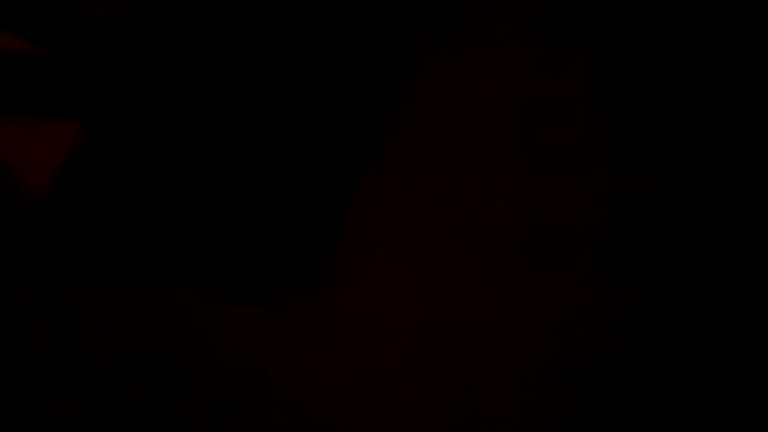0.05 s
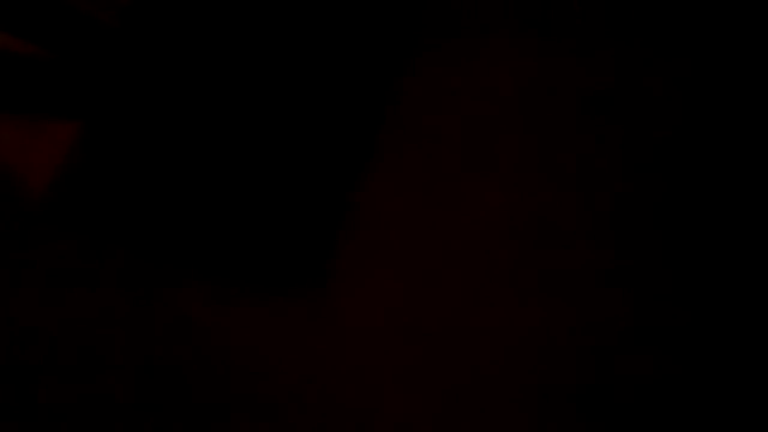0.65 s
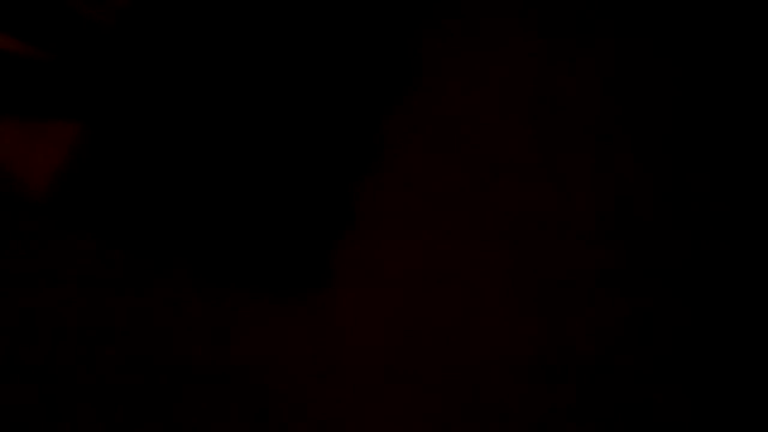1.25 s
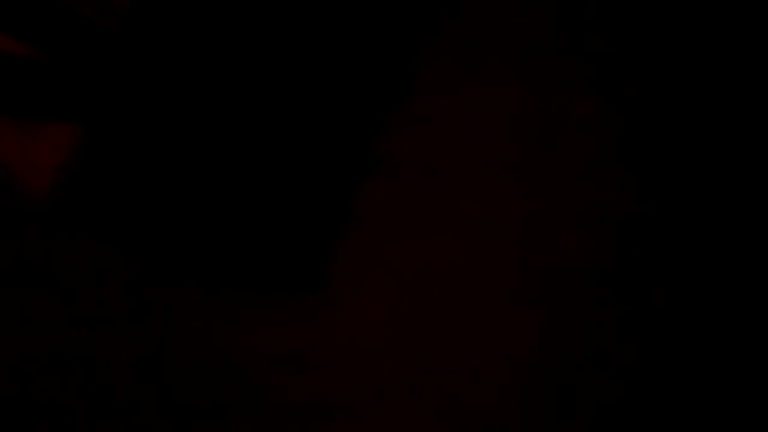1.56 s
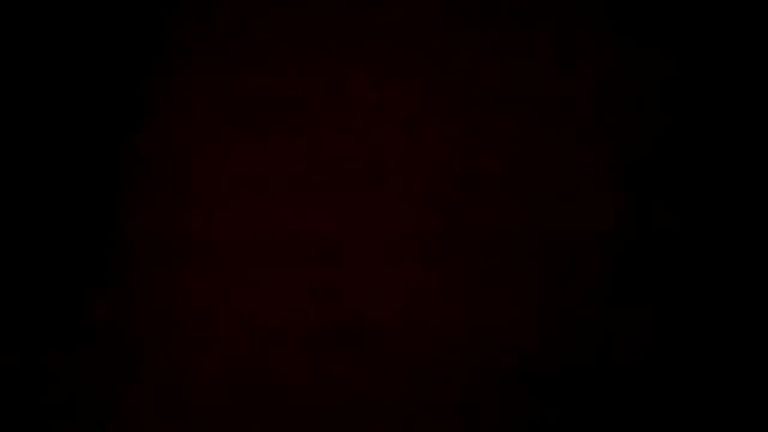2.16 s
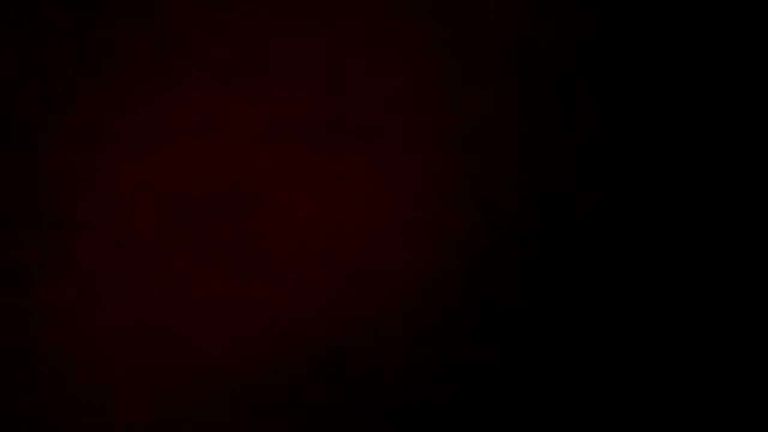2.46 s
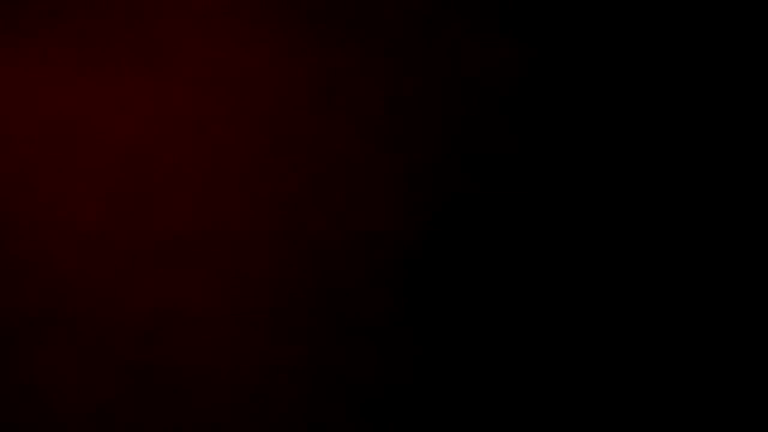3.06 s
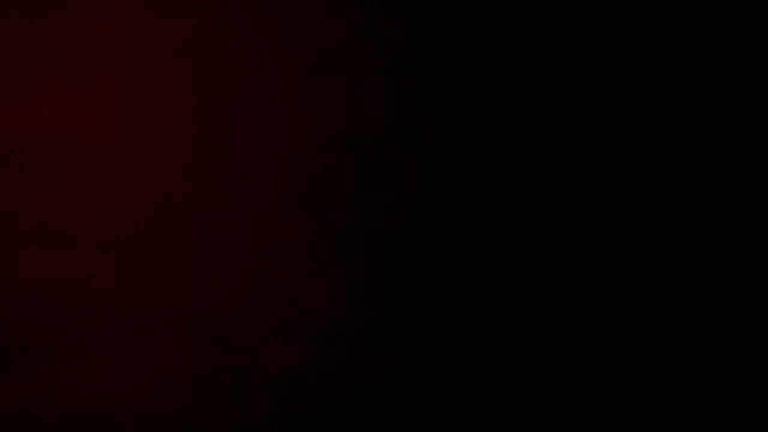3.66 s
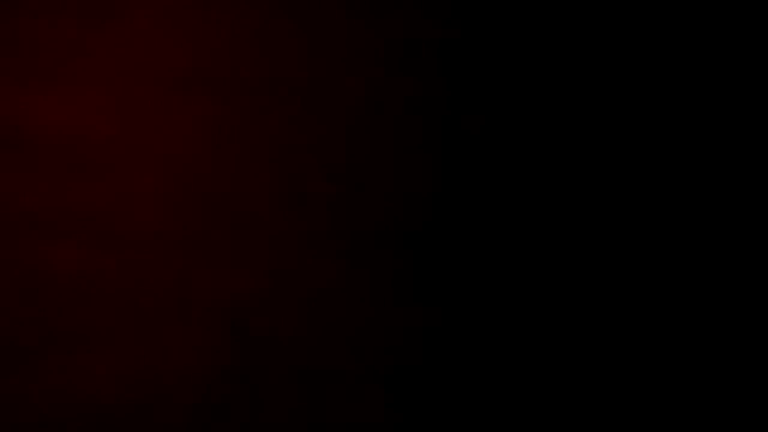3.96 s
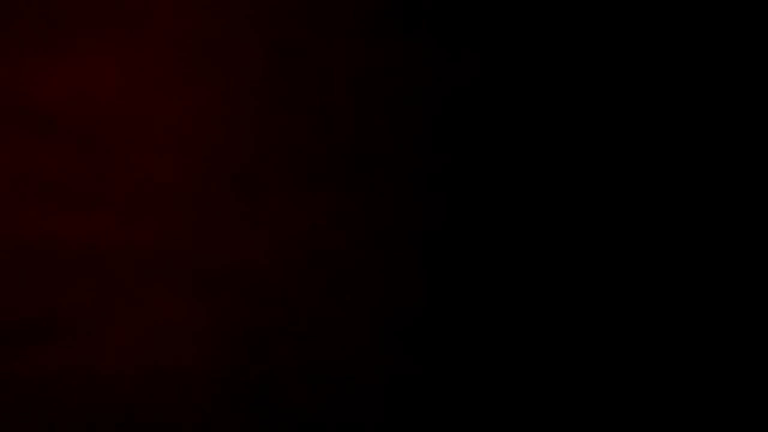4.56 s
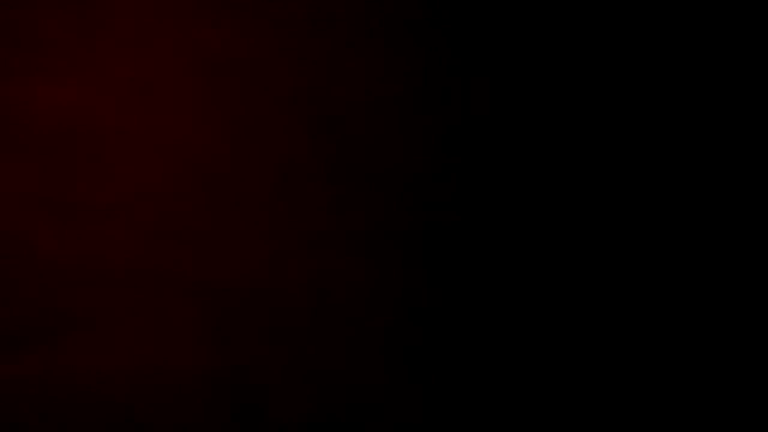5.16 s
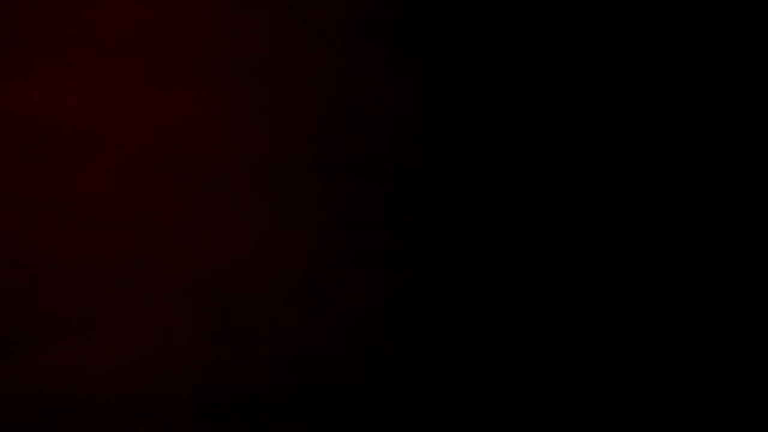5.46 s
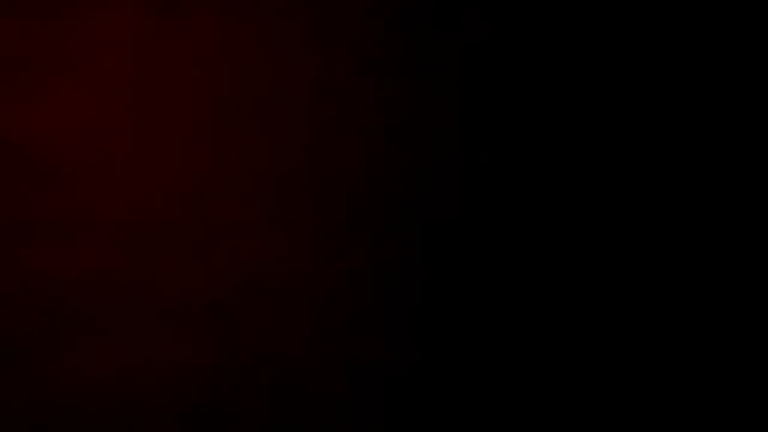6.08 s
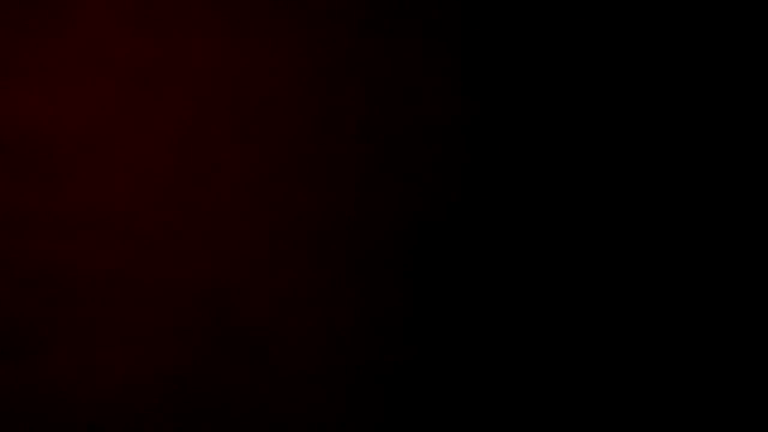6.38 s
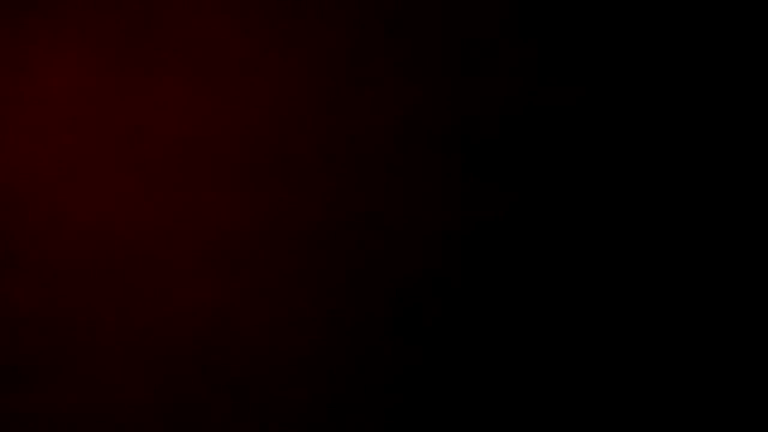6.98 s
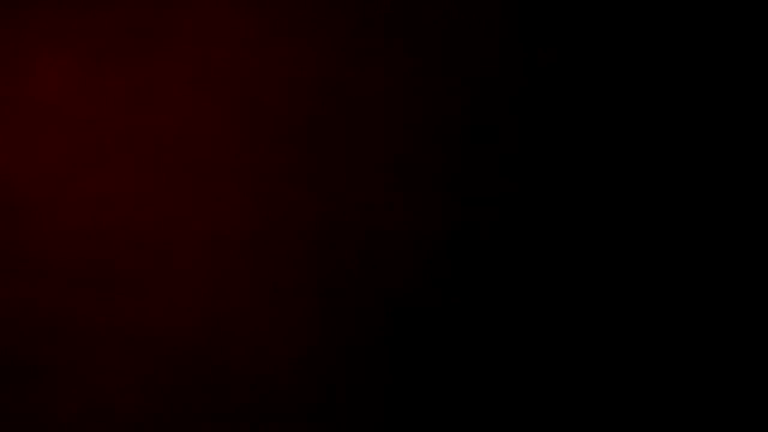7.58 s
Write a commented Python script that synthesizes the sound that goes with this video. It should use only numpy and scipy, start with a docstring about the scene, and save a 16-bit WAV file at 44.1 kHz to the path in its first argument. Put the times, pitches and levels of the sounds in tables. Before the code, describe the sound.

Close, steady cat purring rises and falls with each breath, joined early by small clicks and fur brushing the microphone.

```python
"""In a quiet room with a faint fan hum, a cat purrs right beside a camera.
Its larynx chops the breath about 24 times a second, and the pulses excite a chest resonance:
round thumps as air flows in, lighter double beats with a turbulent rasp as it flows out.
A few small clicks, a soft dull knock and one faint stray purr beat come early; then fur rubs over
the camera, hissing by friction and ticking as tufts snap free. The purr settles toward the right."""
import sys
import numpy as np
from scipy import signal
from scipy.fft import rfft, irfft, next_fast_len
from scipy.io import wavfile
from scipy.ndimage import uniform_filter1d

SR = 44100
rng = np.random.default_rng(int(sys.argv[2]) if len(sys.argv) > 2 else 0)


def transcribe(signal):
    """Save signal, clipped to [-1, 1], as a 16-bit WAV file at the path in sys.argv[1]."""
    frames = np.atleast_2d(signal).T
    limited = np.clip(frames, -1, 1)
    pcm = np.round(limited * 32767).astype(np.int16)
    wavfile.write(sys.argv[1], SR, pcm)


N = 345303
TIME = np.arange(N) / SR

# Spectrum of one laryngeal thump: frequency_hz, gain_db
THUMP_SPECTRUM = [(20, -36), (40, -44), (58, -11.5), (100, -7), (135, -0.5), (190, 1.5), (300, -2.5),
                  (390, -3.5), (490, -13.5), (600, -29.5), (720, -38.5), (1500, -43.5), (3000, -81)]
# Where the cat lies; its bass grows as it comes close: time_s, left_minus_right_db, bass_db
CAT_POSITION = [(0, -3, 1), (1, -3.5, -12), (2.2, -2.7, 0), (2.7, -8, 1), (7.8, -10.5, 0.5)]


def amp(db):
    """Amplitude ratio of a level in decibels."""
    return 10 ** (np.asarray(db) / 20)


def unit_rms(x):
    """Normalisation to rms 1."""
    return x / np.sqrt(np.mean(x ** 2) + 1e-20)


def unit_peak(x):
    """Normalisation to peak 1."""
    return x / abs(x).max()


def curve_at(points, hz):
    """Interpolation on a logarithmic frequency axis."""
    knot_hz, value = np.transpose(points)
    return np.interp(np.log(hz + 1), np.log(knot_hz + 1), value)


def pan(db):
    """Level difference as a cue to direction: left and right gains of mean 1."""
    gains = amp([np.atleast_1d(db) / 2, -np.atleast_1d(db) / 2])
    return gains / gains.mean(0)


def add(mix, start_s, sound):
    """Superposition of a sound on the mix."""
    part = mix[:, max(round(start_s * SR), 0):][:, :sound.shape[-1]]
    part += sound[..., :part.shape[1]]


def add_centred(mix, middle_s, sound):
    """Superposition, timed by the middle of the sound."""
    start_s = middle_s - len(sound) / 2 / SR
    add(mix, start_s, sound[max(round(-start_s * SR), 0):])


def coloured(x, spectrum, balance=((1, 0),)):
    """Spectral shaping to a stereo pair whose level difference can vary with frequency."""
    size = next_fast_len(x.shape[-1])
    hz = np.fft.rfftfreq(size, 1 / SR)
    shaped = rfft(x, size) * amp(curve_at(spectrum, hz)) * pan(curve_at(balance, hz))
    return irfft(shaped, size)[:, :x.shape[-1]]


def bandpass(x, centre_hz, edge_ratio):
    """Band-pass filtering with edges a fixed ratio below and above the centre."""
    edges_hz = [centre_hz / edge_ratio, centre_hz * edge_ratio]
    return signal.sosfilt(signal.butter(2, edges_hz, "band", fs=SR, output="sos"), x)


def correlated(noise, correlation):
    """Partial coherence: two independent noises made as alike as two close ports hear them."""
    a, b = rfft(noise)
    shared = curve_at(correlation, np.fft.rfftfreq(N, 1 / SR))
    return irfft(np.array([a, shared * a + np.sqrt(1 - shared ** 2) * b]), N)


def wander(per_s):
    """Random modulation of rms 1, linear between knots."""
    knots = rng.standard_normal(4000)
    return unit_rms(np.interp(TIME * per_s, np.arange(len(knots)), knots))


def impulse_response(spectrum, size=4096):
    """The minimum-phase response of a body with this spectrum to one tap."""
    log_gain = np.log(amp(curve_at(spectrum, abs(np.fft.fftfreq(size, 1 / SR)))))
    return unit_peak(np.fft.ifft(np.exp(signal.hilbert(log_gain).conj())).real)


def fan_and_hiss(waver_db=3.1):
    """A fan's tones and long-wave murmur reach both ports coherently; each port adds its own hiss."""
    noise_spectrum = [(20, -103), (45, -90), (80, -88), (130, -79), (220, -82.5), (420, -86.5),
                      (530, -83.5), (660, -94.5), (1100, -97), (2000, -99), (8000, -99.5), (11000, -99),
                      (14000, -96)]  # murmur and hiss: frequency_hz, density_db_per_hz
    coherence = [(100, 0.97), (600, 0.53), (1400, 0.06), (3000, 0.056)]  # likeness at the two ports: frequency_hz, correlation
    balance = [(500, 0), (8000, 0.5), (14000, 4.5)]  # lean of the noise: frequency_hz, left_minus_right_db
    hum_tones = [(523.9, -67.5), (572.2, -71.5), (11793, -85)]  # sustained tones: pitch_hz, rms_db
    air = correlated(rng.standard_normal((2, N)), coherence) * np.sqrt(SR / 2)
    hum = np.zeros(N)
    for hz, db in hum_tones:
        level = amp(db + waver_db * wander(per_s=3.4))
        hum += level * np.sin(2 * np.pi * hz * TIME + 0.13 * wander(per_s=5.4))
    return coloured(air, noise_spectrum, balance) + np.sqrt(2) * hum


def puff(spectrum, closure=0.76, size=4096):
    """The pressure pulse of interrupted flow, centred: a push, then a harder pull as the flow shuts."""
    gain = amp(curve_at(spectrum, np.fft.rfftfreq(size, 1 / SR)))
    pulse = np.fft.fftshift(irfft((1j - closure) * gain))
    return unit_peak(pulse * signal.windows.hann(size))


def stretched(pulse, spread=0.072):
    """Cycle-to-cycle variation: a random change in the length of a pulse, about its middle."""
    offset = np.arange(len(pulse)) - len(pulse) / 2
    return np.interp(offset * np.exp(spread * rng.standard_normal()), offset, pulse)


def gust(db, width_s, size=2048):
    """The Gaussian envelope of a short flow of air through the larynx."""
    t = (np.arange(size) - size / 2) / SR
    return amp(db) * np.exp(-.5 * (t / width_s) ** 2)


def larynx_beats(breaths, jitter_s, shimmer_db=1.5, flatness=2.42):
    """A pulse train with jitter and shimmer, shaped breath by breath: time_s, level_db, rasp_db."""
    rows = []
    for first_s, last_s, count, lag_s, first_db, plateau_db, last_db, plateau_at, rasp_db in breaths:
        progress = np.linspace(0, 1, round(count))
        plateau_at = np.clip(plateau_at, .05, .95)
        timing, strength, roughness = rng.standard_normal((len(progress), 3)).T
        bend_s = lag_s * (1 - (2 * progress - 1) ** 2)
        times = first_s + (last_s - first_s) * progress + bend_s + jitter_s * timing
        distance = np.interp(progress, [0, plateau_at, 1], [1, 0, 1])
        end_db = np.where(progress < plateau_at, first_db, last_db)
        db = plateau_db + (end_db - plateau_db) * distance ** flatness
        rows += zip(times, db + shimmer_db * strength, db + rasp_db + shimmer_db * roughness)
    return rows


def inhale(shut_db=-4.5, reopen_db=-5.5, reopen_s=0.0154, bass_hz=170):
    """Valving of inward flow: one thump a beat, with gusts just before the folds shut and as they part."""
    # Inward breaths: first_beat_s, last_beat_s, beat_count, middle_lag_s,
    # first_db, plateau_db, last_db, plateau_fraction, relative_rasp_db
    breaths = [ (.0361, .1601, 4, 0.0015, -27.5, -31.5, -40.5, 0, -25),
               (.7801, 1.2694, 13, 0.0023, -37, -26.5, -41.5, 0.33, -28.5),
               (1.6486, 2.0687, 11, 0.0031, -37.5, -30.5, -48, 0.38, -39),
               (2.5824, 3.1817, 15, 0.0015, -38.5, -26.5, -36.5, 0.57, -21.5),
               (3.6532, 4.2006, 14, 0.0017, -35.5, -26, -36, 0.43, -19.5),
               (4.7128, 5.3055, 15, 0.00294, -31, -25, -40.5, 0.43, -20.5),
               (5.8168, 6.4503, 16, 0.0033, -34, -25, -34.5, 0.46, -21),
               (6.914, 7.505, 15, 0.0012, -32.5, -24.5, -34, 0.38, -21.5)]
    body, flow = np.zeros((2, 1, N))
    thump = puff(THUMP_SPECTRUM)
    for s, db, rasp_db in larynx_beats(breaths, jitter_s=0.00043):
        add_centred(body, s - .0006, amp(db) * stretched(thump))
        add_centred(flow, s - .0035, gust(rasp_db + shut_db, width_s=0.0011))
        add_centred(flow, s + reopen_s, gust(rasp_db + reopen_db, width_s=0.0026))
    bass = signal.sosfiltfilt(signal.butter(1, bass_hz, fs=SR, output="sos"), body)
    times, _, bass_db = np.transpose(CAT_POSITION)
    return body + bass * (amp(np.interp(TIME, times, bass_db)) - 1), flow


def chest(body, hz=101, width_hz=12, ring_db=-3.0):
    """Resonance: a lightly damped low mode keeps humming between the beats."""
    b, a = signal.iirpeak(hz, hz / width_hz, fs=SR)
    return body + amp(ring_db) * signal.lfilter(b, a, body)


def exhale(slap_db=-10, bump_db=-6, snap_db=9, shut_db=-3.5, reopen_db=-3, reopen_s=0.0146, leak_db=-18):
    """Valving of outward flow: a ringing kick and loose slap, then a bump and snap as the folds part."""
    # Outward breaths: first_beat_s, last_beat_s, beat_count, middle_lag_s,
    # first_db, plateau_db, last_db, plateau_fraction, relative_rasp_db
    breaths = [ (.1973, .7371, 15, -0.013, -48, -48, -40, 0.65, -22),
               (2.1069, 2.5389, 12, -0.0037, -47.5, -40, -40.5, 0.89, -16.5),
               (3.2545, 3.6085, 10, -0.0024, -40, -33, -39, 0.62, -15.5),
               (4.273, 4.6675, 11, -0.0036, -39, -34, -63, 0.83, -12.5),
               (5.3387, 5.7716, 12, -.0015, -40, -36, -37.5, 0.25, -14),
               (6.4853, 6.8712, 11, -0.0018, -38.5, -35.5, -36, 0.31, -16),
               (7.5784, 7.8121, 7, 0.0021, -39, -35, -32.5, 1, -14)]
    kick_spectrum = [(20, -23.5), (60, -6.5), (100, -4.5), (130, 2), (165, -2.5), (212, -11.5), (280, 2),
                     (360, 0), (470, -12.5), (600, -30.5), (800, -22.5), (3000, -69)]  # the main beat: frequency_hz, gain_db
    snap_spectrum = [(200, -34), (450, 3), (680, -10.5), (950, -1), (1200, 3), (1600, -5.5), (1950, -20.5),
                     (4000, -50.5)]  # the parting folds: frequency_hz, gain_db
    body, flow = np.zeros((2, 1, N))
    thump = puff(THUMP_SPECTRUM)
    kick, snap = -impulse_response(kick_spectrum), -impulse_response(snap_spectrum)
    for s, db, rasp_db in larynx_beats(breaths, jitter_s=0.00032):
        slap_late, slap_size, part_late, snap_size = rng.standard_normal(4)
        slap_s = s + 0.00484 + 0.00076 * slap_late
        parting_s = s + reopen_s + 0.00089 * part_late
        add(body, s - .0014, amp(db) * kick)
        add_centred(body, slap_s, amp(db + slap_db + 4.2 * slap_size) * thump)
        add_centred(body, parting_s + 0.0012, amp(db + bump_db) * thump)
        add(body, parting_s - .0007, amp(rasp_db + snap_db + 2.6 * snap_size) * snap)
        add_centred(flow, s - .0006, gust(rasp_db + shut_db, width_s=0.00086))
        add_centred(flow, parting_s, gust(rasp_db + reopen_db, width_s=0.0015))
        add_centred(flow, s + 0.0031, gust(rasp_db + leak_db, width_s=0.035))
    return body, flow


def purr(smoothing_s=0.0061, nose_db=-3.0):
    """Chest thumps plus turbulence modulated by the airflow: in the throat and, outward, in the nose."""
    rasp_spectrum = [(300, -36), (680, -19), (900, -0.5), (1150, 1), (1550, -8.5), (1900, -19),
                     (2600, -16.5), (3600, -14), (4500, -21.5), (9000, -28), (14000, -19)]  # throat turbulence: frequency_hz, gain_db
    nose_spectrum = [(1800, -40), (2800, -24), (3600, 2), (4500, -8), (6000, -1), (8000, -7),
                     (14000, -10.5)]  # nasal hiss: frequency_hz, gain_db
    in_body, in_flow = inhale()
    out_body, out_flow = exhale()
    rasp = coloured(rng.standard_normal(N), rasp_spectrum)
    # Even out the noise so that the airflow alone sets its envelope.
    rasp /= np.sqrt(abs(uniform_filter1d(rasp ** 2, round(smoothing_s * SR))) + 1e-12)
    hiss = amp(nose_db) * out_flow * unit_rms(coloured(rng.standard_normal(N), nose_spectrum))
    voice = chest(in_body + out_body) + (in_flow + out_flow) * rasp + hiss
    times, side_db, _ = np.transpose(CAT_POSITION)
    return voice * pan(np.interp(TIME, times, side_db))


def burst(t60_s, grit, size=4096):
    """Impulsive excitation: one impulse, then an exponentially decaying spray of smaller ones."""
    spray = grit * rng.standard_normal(size) * amp(-60 * np.arange(size) / SR / t60_s)
    spray[0] = 1
    return spray


def clicks(snap_lift_db=7, snap_decay_ratio=0.67, snap_hz=4000):
    """Small impacts, each exciting a brief hollow resonance and a bright snap."""
    # Impacts: start_s, body_peak_db, body_hz, t60_s, snap_db (before the lift), left_minus_right_db
    impacts = [ (0.8547, -42, 2100, 0.007, -35, -9), (.942, -32, 13000, .01, -52, 2.5),
               (1.0075, -33.5, 1440, .017, -40.5, -11), (1.0202, -38.5, 1710, .052, -43, 4),
               (1.041, -55, 2600, 0.018, -36, 14), (1.047, -42, 1000, 0.033, -35, -20),
               (1.056, -51, 1400, 0.067, -39.5, 19), (1.199, -34.5, 1100, .0036, -26.5, -6),
               (1.2548, -43.5, 1430, 0.011, -28.5, -2), (1.324, -33.5, 3450, .025, -41, -12),
               (1.365, -62, 1500, 0.0089, -36.5, -7), (1.376, -35.5, 1350, 0.058, -52, -2),
               (1.386, -47, 1500, 0.019, -45, 7), (7.6035, -38.5, 5330, 0.021, -43, 12)]
    highpass = signal.butter(1, snap_hz, "high", fs=SR, output="sos")
    out = np.zeros((2, N))
    for s, body_db, hz, t60_s, snap_db, side_db in impacts:
        body = unit_peak(bandpass(burst(t60_s, grit=0.13), hz, edge_ratio=1.26))
        snap = unit_peak(signal.sosfilt(highpass, burst(snap_decay_ratio * t60_s, grit=0.32)))
        add(out, s, (amp(body_db) * body + amp(snap_db + snap_lift_db) * snap) * pan(side_db))
    return out


def knock_and_stray_beat():
    """Damped impulse responses: a soft dull knock, then a faint stray purr beat before the next inhale."""
    pulses = [(1.5564, -26.5, 0.0066, -3.5), (1.609, -41, 0.035, -2)]  # the knock, then the purr beat: start_s, peak_db, t60_s, left_minus_right_db
    dull_spectrum = [(40, -37), (120, 0.5), (280, 1.5), (450, 0.5), (700, -12), (1150, -14), (1500, -34),
                     (4000, -34), (14000, -42)]  # the timbre of both: frequency_hz, gain_db
    response = -impulse_response(dull_spectrum)
    out = np.zeros((2, N))
    for s, db, t60_s, side_db in pulses:
        pulse = unit_peak(signal.fftconvolve(burst(t60_s, grit=0.081), response))
        add(out, s, amp(db) * pulse * pan(side_db))
    return out


def rubbing_level(drop_db=9.5, roundness=1.92):
    """Incoherent addition: the strokes of fur swell and ease off, and their powers sum."""
    # Fur over the camera: crest_s, crest_db, rise_s, fall_s (each spanning drop_db)
    strokes = [(2.11, -45.5, 0.092, 0.084), (2.21, -43, 0.054, 0.057), (2.43, -45, .13, 0.091),
               (2.585, -43, .11, 0.095), (2.905, -35.5, 0.25, 0.16), (3.22, -49, 0.22, .17),
               (3.47, -46.5, 0.12, 0.096), (3.62, -50.5, .035, 0.039), (4.44, -54.5, .17, 0.14)]
    power = np.zeros(N)
    for s, db, rise_s, fall_s in strokes:
        distance = np.maximum((s - TIME) / rise_s, (TIME - s) / fall_s)
        power += amp(db - drop_db * np.minimum(distance, 10) ** roundness) ** 2
    return np.sqrt(power)


def fur_rustle(hairs_per_s=1500, hairs_db=-3, patchy_db=1.62):
    """Friction at the microphone ports: many hairs merge into a hiss, with single ones flicking through."""
    fur_spectrum = [(100, -12), (400, -7), (750, -3.5), (1000, -2), (1600, 3.5), (2000, -1), (2700, -1.5),
                    (3400, 4), (4300, 0), (6000, 3), (8000, -5.5), (10000, 1.5), (12000, 1.5), (14000, 2.5)]  # friction noise: frequency_hz, gain_db
    balance = [(500, -6), (1500, -1.5), (4000, 3), (8000, 0), (13000, 12.5)]  # lean of the rustle: frequency_hz, left_minus_right_db
    coherence = [(300, 0.18), (1200, 0.82), (2500, 0.0089), (5000, 0)]  # likeness at the two ports: frequency_hz, correlation
    level = rubbing_level() * amp(patchy_db * wander(per_s=70))
    signs = rng.choice([-1, 1], (2, N))
    sizes = amp(4 * np.minimum(rng.exponential(1, (2, N)), 3))
    hairs = signs * sizes * (rng.random((2, N)) < hairs_per_s / SR)
    friction = rng.standard_normal((2, N)) + amp(hairs_db) * unit_rms(hairs)
    return level * unit_rms(coloured(correlated(friction, coherence), fur_spectrum, balance))


def bedding_scuffs():
    """Sliding friction of the camera on the bedding: dull band noise that swells quickly and dies away."""
    # Slides: start_s, length_s, crest_rms_db, centre_hz, edge_ratio, left_minus_right_db
    slides = [(2.069, .33, -55.5, 660, 1.47, 0), (4.426, .032, -41.5, 477, 1.13, -12)]
    out = np.zeros((2, N))
    for s, length_s, db, hz, edge_ratio, side_db in slides:
        envelope = np.sin(np.pi * np.sqrt(np.linspace(0, 1, round(length_s * SR))))
        grain = unit_rms(bandpass(rng.standard_normal(SR), hz, edge_ratio)[-len(envelope):])
        add(out, s, amp(db) * grain * envelope * pan(side_db))
    return out


def tuft_flicks(t60_s=0.012, lift_db=4, side_db=6, small_per_s=18, small_db=13, scatter_db=6.0):
    """Stick and slip: tufts catch and snap free with a tick; small random ones scale with the rubbing."""
    releases = [(2.4654, -33), (2.4764, -34), (2.59, -25.5), (2.6216, -26.5), (2.6509, -31), (3.051, -28.5),
                (3.1593, -32), (3.4146, -30.5), (3.468, -34), (3.5029, -30), (4.121, -41)]  # larger tufts: start_s, peak_db (before the lift)
    tick_spectrum = [(200, -5), (700, -12), (1400, -1), (2500, -10), (4500, 1), (8000, -2), (12000, -0.5),
                     (14000, -5)]  # one bright tick: frequency_hz, gain_db
    tick = impulse_response(tick_spectrum)
    small_slips = (rng.random(N) < small_per_s / SR) * rubbing_level()
    small_slips *= amp(small_db + scatter_db * rng.standard_normal(N))
    small_tick = unit_peak(signal.fftconvolve(burst(t60_s / 2, grit=0.25), tick))
    out = signal.oaconvolve(small_slips, small_tick)[None, :N]
    for s, db in releases:
        add(out, s, amp(db + lift_db) * unit_peak(signal.fftconvolve(burst(t60_s, grit=0.36), tick)))
    return out * pan(side_db)


def port_delay(x, samples=4):
    """Path difference: near sounds reach the left port just after the right."""
    return np.array([np.pad(x[0], (samples, 0))[:N], x[1]])


def reverberation(x, t60_s=0.24, wet_db=-17, size=12000):
    """Reflections from furniture and walls decay exponentially, nearly alike at both ports."""
    t = np.arange(size) / SR
    taps = rng.standard_normal(size) + 0.054 * rng.standard_normal((2, size))
    taps *= amp(-60 * t / t60_s) * (t > .005)
    taps /= np.linalg.norm(taps[0])
    return amp(wet_db) * signal.fftconvolve(x.mean(0)[None], taps, axes=1)[:, :N]


def scene():
    """Superposition of the near sounds, their reflections, the rustle at the ports and the room noise."""
    near = port_delay(purr() + clicks() + knock_and_stray_beat() + bedding_scuffs() + tuft_flicks())
    return near + reverberation(near) + fur_rustle() + fan_and_hiss()


def record(dry):
    """Band limiting by a steep linear-phase low-pass filter."""
    cutoff_hz = 14350
    lowpass = signal.firwin(1023, cutoff_hz, window=("kaiser", 9), fs=SR)
    return signal.oaconvolve(dry, lowpass[None], "same")


dry = scene()
out = record(dry)
transcribe(out)
```